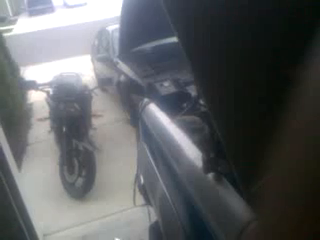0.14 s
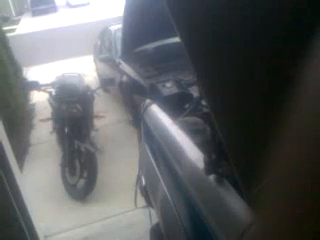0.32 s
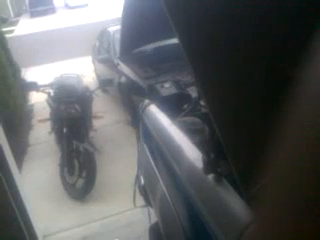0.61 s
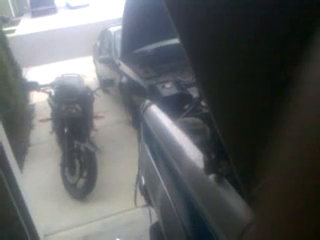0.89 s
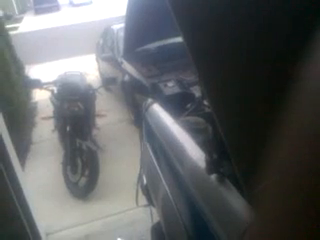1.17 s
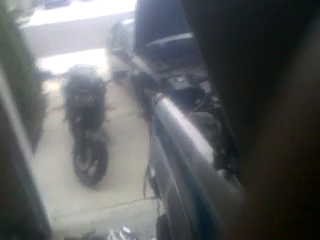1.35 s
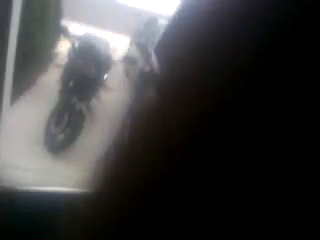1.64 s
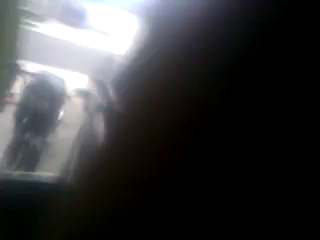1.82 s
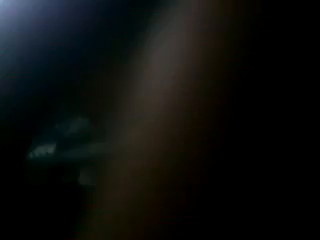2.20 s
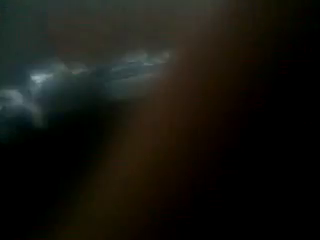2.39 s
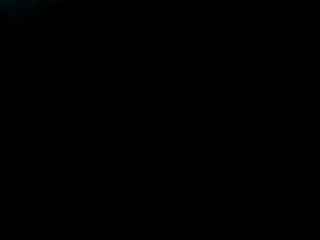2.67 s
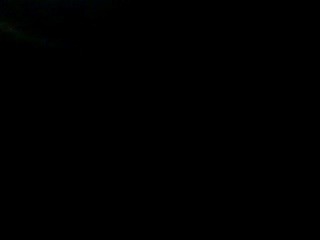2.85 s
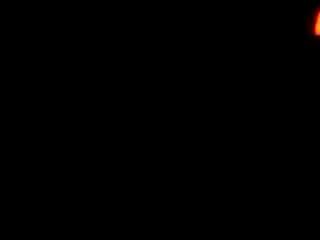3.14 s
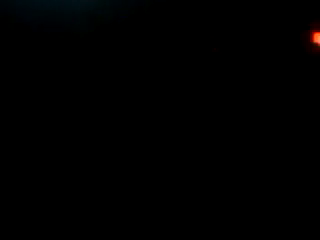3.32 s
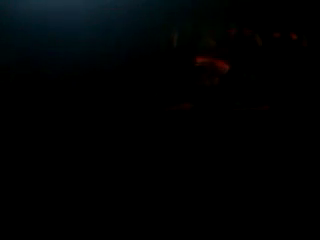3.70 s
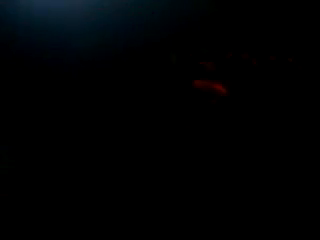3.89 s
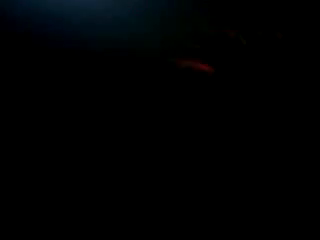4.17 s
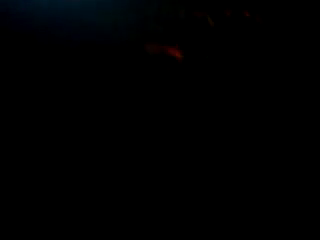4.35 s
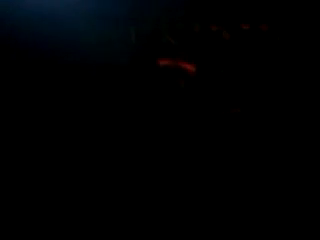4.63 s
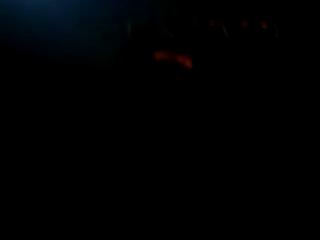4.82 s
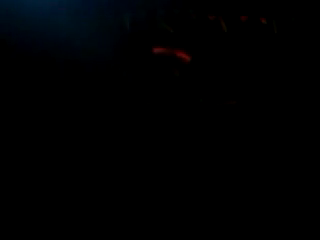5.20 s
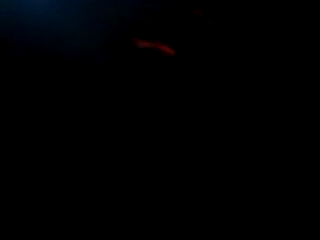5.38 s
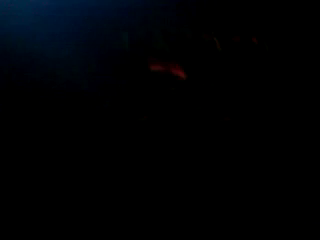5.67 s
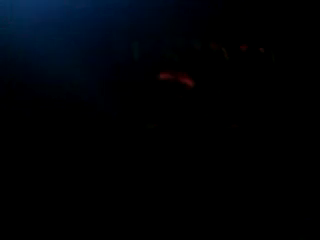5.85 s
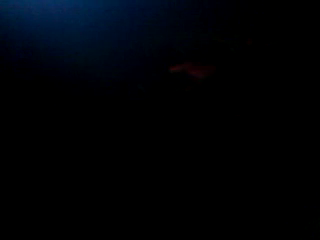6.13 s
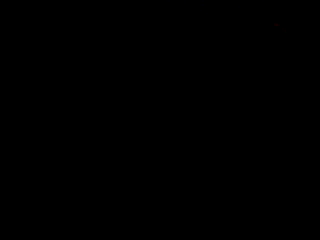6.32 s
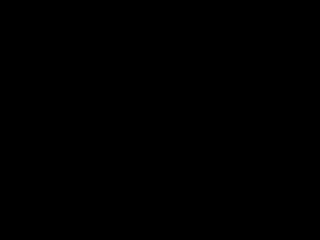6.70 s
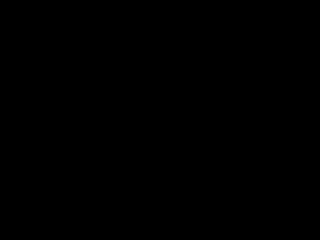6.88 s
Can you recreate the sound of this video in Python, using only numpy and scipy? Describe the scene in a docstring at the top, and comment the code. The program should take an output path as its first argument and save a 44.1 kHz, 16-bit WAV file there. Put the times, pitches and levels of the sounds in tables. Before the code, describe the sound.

Knocking V8 diesel idle with faint belt squeaks, then bumps and a thump, and three quick throttle blips heard inside the cab.

```python
"""A V8 diesel pickup idles with its hood open, heard first from the open door. Each firing knocks the
block and sends an exhaust pulse into the cab; injectors tick between firings, unequal cylinders make
the engine lope, and the belt squeaks faintly. From about 2 s, climbing in brings a few bumps, a heavy
thump and a hard click, and the engine is heard through the resonances of the cab. From about 5 s the
throttle is blipped three times: the knock hardens and the engine note sweeps through the cab modes."""
import sys
import numpy as np
from scipy import signal
from scipy.fft import rfft, irfft, next_fast_len
from scipy.io import wavfile
from scipy.ndimage import uniform_filter1d

SR = 44100
rng = np.random.default_rng(int(sys.argv[2]) if len(sys.argv) > 2 else 0)


def transcribe(u):
    """Save the signal u as a 16-bit wav file named by the first command-line argument.

    u: samples, shape (n,) or (channels, n), limited to [-1, 1]; the rate is SR.
    q: integer samples, one column per channel.
    """
    v = np.clip(np.atleast_2d(u).T, -1, 1)
    q = np.round(v * 32767).astype(np.int16)
    wavfile.write(sys.argv[1], SR, q)


N = 309573
T = np.arange(N) / SR

# relative strength of the cylinders in firing order, scaled by each layer (level/dB)
CYLINDER_LEVELS = [-3.0, -3.5, 3.5, 2.7, 1.0, -.6, -2.0, -2.6]
# firing rate at idle (t/s, f/Hz)
IDLE_RATE = [(0, 45.6), (.7, 45.8), (1.0, 47.2), (1.3, 46.0), (2.3, 46.3), (3.0, 46.0), (5.15, 46.0)]
# presses of the pedal (t/s, duration/s, relative fuel)
PEDAL_PRESSES = [(5.138, .07, 0.46), (5.199, 0.15, 1.1), (5.378, 0.045, 0.94), (5.783, 0.21, 0.73),
                 (6.146, 0.066, 0.28), (6.214, 0.044, 0.26), (6.252, 0.1, 1.0)]
# hard firings that flare into a rattle (t/s, accent/dB, decay/s, ring f/Hz)
HARD_FIRINGS = [(0.032, 1.5, 0.011, 1780), (0.138, 9.5, 0.055, 1910), (0.201, 1.5, 0.028, 2280),
                (0.372, 6, 0.009, 2160), (0.482, 7.5, 0.061, 870), (0.505, 3, 0.031, 1460),
                (0.739, -2.5, 0.019, 990), (0.853, 2, 0.037, 1850), (1.064, 3.5, 0.06, 2280),
                (1.24, 2.5, 0.023, 1830), (1.443, 2, 0.03, 1670), (1.550, 7, 0.03, 1310),
                (1.612, 0, 0.044, 2820), (1.864, 4, 0.026, 1210), (1.938, 1, 0.022, 1820),
                (2.137, 0, 0.046, 1300), (2.221, 8, 0.032, 2160), (2.39, 8, 0.036, 2530),
                (3.080, 4, 0.066, 1080), (3.147, 1, 0.045, 1840), (3.691, 2, 0.071, 1900),
                (3.859, -0.5, 0.061, 1820), (4.197, 1, 0.086, 2530), (4.550, 1, 0.069, 2790),
                (4.719, 2.5, 0.073, 2790), (4.885, 2.5, 0.029, 2660), (5.782, -0.5, 0.015, 2280),
                (5.842, 1.5, 0.035, 1750), (5.918, 4.5, 0.038, 2700), (5.97, 1.5, 0.04, 1680),
                (6.261, 0.5, 0.038, 2600), (6.292, 3, 0.026, 2700), (6.435, 4.5, 0.05, 1900),
                (6.535, 4, 0.094, 1800)]


def undb(db):
    """Amplitude ratio of a level in decibels."""
    return 10 ** (np.asarray(db) / 20)


def unit(x):
    """Normalisation to rms 1."""
    return x / np.sqrt(np.mean(x ** 2))


def steady(x):
    """Normalisation to a running rms of 1 over a third of a second."""
    return x / np.sqrt(uniform_filter1d(x ** 2, SR // 3) + 1e-12)


def between(table):
    """Linear interpolation of (t/s, value) points over the scene."""
    return np.interp(T, *np.transpose(table))


def dying(start, decay_s):
    """Exponential decay from 1 after a sudden onset."""
    return (T >= start) * np.exp(-np.abs(T - start) / decay_s)


def held(start, end, rise_s, fall_s):
    """First-order lag: a rise towards 1 from the start and a fall to 0 after the end."""
    return (1 - np.exp(-np.maximum(T - start, 0) / rise_s)) * np.exp(-np.maximum(T - end, 0) / fall_s)


def colour(x, points, modes=()):
    """Minimum-phase filter: a broad (f/Hz, level/dB) shape with resonant peaks and dips on top."""
    size = 2 * next_fast_len(N // 2 + SR // 4)
    f = np.maximum(np.fft.rfftfreq(size, 1 / SR), 1)
    hz, db = np.transpose(points)
    shape = np.interp(np.log(f), np.log(hz), db)
    for centre, width, peak in modes:
        shape = shape + peak / (1 + (2 * (f - centre) / width) ** 2)
    # folding the cepstrum makes the filter causal
    cepstrum = irfft(np.log(undb(shape)))
    cepstrum[1:size // 2] *= 2
    cepstrum[size // 2 + 1:] = 0
    return irfft(rfft(x, size) * np.exp(rfft(cepstrum)))[:N]


def revving(spin_up_s=.145, coast_s=.315):
    """Flywheel inertia: speed above idle, as a share of the full rev, rises fast and falls slowly."""
    # top of each blip (t/s, share of the full rev)
    blips = [(5.42, 1), (5.98, .57), (6.39, 1)]
    swells = [share * np.exp(-((T - s) / np.where(T < s, spin_up_s, coast_s)) ** 2)
              for s, share in blips]
    return np.max(swells, axis=0)


def fuelling():
    """Fuel follows the pedal with a first-order lag."""
    doses = [fuel * held(s, s + length, rise_s=.0049, fall_s=.062) for s, length, fuel in PEDAL_PRESSES]
    return np.max(doses, axis=0)


def firings(crank, lag, scatter_db, jitter_s, uneven_s):
    """Quasi-periodic impulses (sample, cylinder, size); each cylinder has its own timing offset."""
    number = np.arange(-1, int(crank[-1]))
    cylinder = number % 8
    offset = uneven_s * rng.standard_normal(8)
    jitter, scatter = rng.standard_normal((len(number), 2)).T
    when = np.interp(number + lag, crank, T, left=-1) + offset[cylinder] + jitter_s * jitter
    return np.clip(when * SR, 0, N - 1).astype(int), cylinder, undb(scatter_db * scatter)


def bursts(at, cylinder, size, decay_s, tail_db, tail_s, repeat):
    """Impulses excite decaying noise; the share `repeat` of its power recurs with each cylinder."""
    t = T[:SR // 8]
    envelope = np.hypot(np.exp(-t / decay_s), undb(tail_db) * np.exp(-t / tail_s))
    blows = np.zeros((8, N))
    blows[cylinder, at] = size
    recurring = sum(signal.oaconvolve(own, envelope * rng.standard_normal(len(t)))[:N] for own in blows)
    power = np.abs(signal.oaconvolve(blows.sum(0) ** 2, envelope ** 2)[:N])
    return np.sqrt(repeat) * recurring + np.sqrt((1 - repeat) * power) * rng.standard_normal(N)


def body_hum(crank, inside, rev):
    """Forced resonance: the idle firing rate sits on a low body mode, whose hum fades as speed rises."""
    # level of the hum at idle speed (t/s, level/dB)
    hum_levels = [(2.3, -36.5), (2.95, -29.5), (3.3, -27), (3.55, -31.5), (3.8, -27), (5.2, -28),
                  (7.0, -31)]
    push = np.cos(2 * np.pi * crank) + undb(13.5 - 3.6 * inside) * rng.standard_normal(N)
    spectrum = [(12, -6.5), (46, -12.0), (90, -13.5), (200, -47.0), (600, -100)]
    hum = steady(colour(push, spectrum, modes=[(46.3, 18, 3.3)]))
    detuned = np.interp(T - .092, T, np.tanh(rev / .65))  # delayed, as the mode rings on
    return undb(between(hum_levels) - 24 * detuned) * hum


def belt_squeaks(wobble_hz=40):
    """Friction: the belt slips on a pulley in short chirps of unsteady pitch."""
    # slips of the belt (t/s, f/Hz, rms level/dB, half duration/s)
    slips = [(.315, 4060, -31, .024), (.760, 4045, -32, .022), (.900, 4130, -36, .025),
             (1.085, 4050, -35, .03), (1.245, 4045, -31.5, .032), (1.420, 4040, -37, .03),
             (1.535, 4130, -35, .028), (1.975, 3950, -31, .018), (2.330, 4050, -38, .03)]
    wobble = np.cumsum(wobble_hz * unit(uniform_filter1d(rng.standard_normal(N), SR // 600))) / SR
    chirps = np.zeros(N)
    for s, hz, db, half_s in slips:
        envelope = np.sqrt(2) * undb(db) * np.exp(-((T - s) / half_s) ** 2)
        chirps += envelope * np.sin(2 * np.pi * (hz * T + wobble))
    return chirps


def panel_bumps():
    """Damped oscillation: soft blows give a short, low swing with a scuff of noise on top."""
    # climbing in, then the engine lurching on its mounts
    # (t/s, level/dB, f/Hz, decay/s, relative scuff level/dB)
    impacts = [(2.064, -9, 250, 0.0033, -10), (2.124, -5.5, 280, 0.0035, -15),
               (2.181, -3.5, 205, 0.0057, -10.5), (2.208, -16, 130, 0.0077, -3),
               (2.25, -10, 195, 0.0052, -4), (2.352, -14, 92, 0.0077, -6), (2.397, -12.5, 283, 0.0036, -2),
               (2.787, -13.5, 140, 0.0047, -1.5), (2.797, -13, 177, 0.0057, -29),
               (2.823, 6.5, 73.4, 0.0088, -28), (2.825, -3, 130, 0.0055, -12.5),
               (2.851, -11.5, 202, 0.0064, -5.5), (4.018, -16, 70, 0.0077, -14),
               (5.296, -19, 77.4, .025, -18), (5.291, -18, 166, 0.037, -20),
               (5.301, -12.5, 241, 0.021, -17), (6.315, -19, 236, 0.022, -19),
               (6.322, -18.5, 162, 0.025, -18), (6.324, -28, 82, 0.022, -22)]
    scuff_spectrum = [(60, -23), (190, 1.5), (340, 1), (520, -4.5), (730, -3.5), (1200, -17),
                      (6000, -14.0), (9000, -55.5)]
    thuds, scuffs = np.zeros(N), np.zeros(N)
    for s, db, hz, decay, scuff_db in impacts:
        t = np.maximum(T - s, 0)
        envelope = undb(db) * np.exp(-t / decay) * (1 - np.exp(-t * hz * 3))
        # a panel radiates little below its own pitch
        radiation = signal.butter(2, .5 * hz, "highpass", fs=SR, output="sos")
        thuds -= signal.sosfilt(radiation, envelope * np.sin(2 * np.pi * hz * t) + 1e-18)
        scuffs += envelope * undb(scuff_db)
    return thuds + scuffs * unit(colour(rng.standard_normal(N), scuff_spectrum))


def plastic_clicks():
    """Hard impacts excite a broad band: plastic snaps that die quickly in the cab."""
    # snaps before filtering (t/s, level/dB, decay/s)
    snaps = [(2.064, -12, 0.002), (2.179, -11.5, 0.0027), (2.787, -15.5, 0.0025), (2.821, -16.5, 0.013),
             (3.081, -22.5, 0.072), (3.332, -1.5, 0.0094)]
    # response of the plastic (f/Hz, level/dB)
    spectrum = [(250, -16), (700, -8), (1100, -27.5), (1650, 7.5), (2400, -13), (3700, -3), (5000, -13.5),
                (6400, -0.5), (7300, -3.5)]
    envelope = sum(undb(db) * dying(s, decay) for s, db, decay in snaps)
    return colour(envelope * rng.standard_normal(N), spectrum)


def engine_note(crank, flutter_db=1.8, flutter_hz=11):
    """Harmonic series of the firing rate: each partial swells as it glides across a cab mode."""
    # harmonics 1 to 5 before filtering (level/dB)
    harmonic_levels = [-8, -1.5, -6, -6, -9]
    # broad response to the note (f/Hz, level/dB)
    spectrum = [(50, -12), (75, 0), (100, -7), (135, -1), (200, -5), (270, -3), (330, -10), (450, -11)]
    # booms of the cab (f/Hz, width/Hz, level/dB)
    cab_modes = [(76, 10, 5), (162, 22, 3), (241, 20, 12)]
    slow = signal.butter(2, flutter_hz, fs=SR, output="sos")
    partials = np.zeros(N)
    for k, db in enumerate(harmonic_levels, 1):
        flutter = unit(signal.sosfilt(slow, rng.standard_normal(N)))
        partials += undb(db + flutter_db * flutter) * np.sin(2 * np.pi * k * crank)
    return colour(partials, spectrum, cab_modes)


def exhaust_drone(crank, inside):
    """Cavity resonance: exhaust puffs shake the body and drive the air modes of the cab."""
    # broad spectrum of the drone (f/Hz, level/dB)
    spectrum = [(20, -4.5), (40, 7.5), (80, 1.5), (125, 0.5), (190, 0.5), (290, -4.5), (400, -7),
                (600, -5.5), (1200, -62.5)]
    # peaks and dips beside the engine bay and in the cab (f/Hz, width/Hz, level/dB)
    bay_modes = [(81.4, 18, 4.5), (102, 18, -5.5), (128.6, 9.5, 10), (151, 48, -4.5), (310, 86, 4.5),
                 (534, 150, 3)]
    cab_modes = [(87, 14, 6.4), (128, 17, 5.9), (159, 24, 7), (245.4, 25.4, 13.8), (268, 16, 4)]
    pulses = firings(crank, lag=.5015, scatter_db=.5, jitter_s=.0002, uneven_s=.002394)
    puffs = unit(bursts(*pulses, decay_s=.033, tail_db=-1, tail_s=.026, repeat=.72))
    bay = steady(colour(puffs, spectrum, bay_modes))
    cab = steady(colour(puffs, spectrum, cab_modes))
    return steady((1 - inside) * bay + inside * cab)


def injector_ticks(crank, off_idle, fuel, rasp_fuel=.59):
    """Impact noise of injectors and valves: light at idle, a rasp under fuel, a hiss while coasting."""
    # broad spectrum of the ticks (f/Hz, level/dB)
    spectrum = [(1500, -31), (2400, -16), (2800, -2), (3300, -4), (4100, -1), (4800, -3.5), (5600, -2),
                (6600, -2.5), (7300, -7.5)]
    # metal resonances at idle, under load and coasting (f/Hz, width/Hz, level/dB)
    idle_modes = [(4050, 190, 6.5), (4460, 130, 4.6), (5400, 27, 1.3)]
    load_modes = [(2250, 140, 7), (2560, 290, 14), (2750, 350, 10.5), (3130, 160, 7.5), (3800, 340, -3.5),
                  (4420, 63, 5), (4870, 810, 8), (6800, 180, 2.5)]
    coast_modes = [(3050, 220, 8.5), (3780, 290, 1.2), (4850, 1800, 3.6)]
    at, cylinder, size = firings(crank, lag=.6, scatter_db=2.5, jitter_s=.002, uneven_s=.004)
    size = size * undb(.5 * np.array(CYLINDER_LEVELS))[cylinder]
    ticks = bursts(at, cylinder, size, decay_s=.0071, tail_db=6.5, tail_s=.08, repeat=.17)
    light, rasp, hiss = (steady(colour(ticks, spectrum, modes))
                         for modes in (idle_modes, load_modes, coast_modes))
    load = np.tanh(fuel / rasp_fuel)
    return steady((1 - off_idle) * light + off_idle * (load * rasp + (1 - load) * hiss))


def flare_rings(clatter, width_hz=130, gain_db=-2.5):
    """Selective resonance: each hard firing makes one part of the engine ring in a narrow band."""
    rings = np.zeros(N)
    for s, _, decay, hz in HARD_FIRINGS:
        span = (T >= s) & (T < s + .4)
        part = signal.butter(1, [hz - width_hz / 2, hz + width_hz / 2], "bandpass", fs=SR, output="sos")
        rings[span] += signal.sosfilt(part, clatter[span] * np.exp(-(T[span] - s) / decay))
    return undb(gain_db) * rings


def knock_accents(crank, off_idle, fuel):
    """Amplitude modulation in dB: unequal cylinders lope once in two turns; fuel adds hammering."""
    # depth of the lope (t/s, share of the cylinder differences)
    lope_depth = [(0.4, 0.76), (1.2, 0.74), (1.6, 0.68), (2.3, .5), (2.9, 0.58), (5.0, 0.82)]
    since_hardest_s = (crank - np.argmax(CYLINDER_LEVELS)) % 8 / between(IDLE_RATE)
    snap = 1.5 * np.exp(-since_hardest_s / .006)
    cycle = np.array(CYLINDER_LEVELS)[np.floor(crank).astype(int) % 8] + snap
    lope = cycle * (1 - off_idle) * between(lope_depth)
    hammer = 3 * fuel * (.5 - crank % 1)
    flare = sum(db * dying(s, decay) for s, db, decay, _ in HARD_FIRINGS)
    # the first firings of a press knock hardest
    bite = sum(4.5 * depth * dying(s, decay_s=.062) for s, _, depth in PEDAL_PRESSES)
    return uniform_filter1d(lope + hammer + flare + bite, SR // 300)


def combustion_knock(crank, inside, off_idle, fuel):
    """Impulse excitation: each combustion rings the block's modes and rebounds around the engine bay."""
    # broad spectrum of the knock (f/Hz, level/dB)
    spectrum = [(100, -30), (200, -19), (330, -9.5), (450, -12.5), (620, -9), (800, -3), (1000, -1.5),
                (1250, 0), (1550, -0.5), (1900, -3), (2300, -4.5), (2700, -10.5), (3200, -17.5),
                (4500, -18), (7000, -36.5)]
    # peaks and dips beside the bay, in the cab, and added there off idle (f/Hz, width/Hz, level/dB)
    bay_modes = [(577, 30, 3), (620, 36, 5.5), (775, 35, 6), (960, 28, 4.5), (1207, 41, 5), (1710, 56, 4.5),
                 (1872, 52, 5), (1958, 39, 6.5), (2268, 29, 8.5), (2470, 56, 5), (2655, 45, 4),
                 (2600, 54, 4), (3030, 59, 2.5)]
    cab_modes = [(480, 130, -5), (631, 21, 6), (721, 37, 5.5), (845, 30, 4), (930, 380, -2),
                 (1204, 56, 1.5), (1283, 24, 3.5), (1640, 35, -2.5), (1822, 100, 6), (2015, 100, 5),
                 (2214, 62, 5.5), (2765, 88, 5.5), (3110, 110, 6)]
    rev_modes = [(694, 160, 2), (1547, 51, 2), (1730, 50, 2), (1830, 210, -4.5), (2314, 44, 0)]
    at, cylinder, size = firings(crank, lag=.3, scatter_db=1, jitter_s=.002, uneven_s=.004)
    size = size ** (1 + 1.5 * off_idle[at])  # off idle the knocks differ more in strength
    blows = bursts(at, cylinder, size, decay_s=.004, tail_db=0, tail_s=.06, repeat=.22)
    bay, cab_idle, cab_revved = (steady(colour(blows, spectrum, modes))
                                 for modes in (bay_modes, cab_modes, cab_modes + rev_modes))
    cab = (1 - off_idle) * cab_idle + off_idle * cab_revved
    clatter = steady((1 - inside) * bay + inside * cab)
    clatter = clatter + flare_rings(clatter)
    # a harder knock is also brighter: accents act more strongly on the treble
    accent_db = knock_accents(crank, off_idle, fuel)
    dull = signal.sosfiltfilt(signal.butter(2, 1400, fs=SR, output="sos"), clatter)
    return dull * undb(.7 * accent_db) + (clatter - dull) * undb(1.3 * accent_db)


def scene():
    """Superposition: one crank phase drives all engine layers; speed and fuel set their levels."""
    # transmission of the engine past door and cab (t/s, level/dB)
    shielding = [(2.3, 2.4), (2.45, 0), (2.57, -7), (2.72, -1), (2.95, -6), (3.12, -5), (3.55, -5.5),
                 (5.3, -6), (6.3, -5), (7.0, -8.5)]
    rev, fuel = revving(), fuelling()
    off_idle = held(5.18, 6.857, rise_s=.076, fall_s=.076)  # the governor cuts the idle fuel
    inside = np.interp(T, [2.16, 2.6], [0, 1])  # from beside the engine bay into the cab
    firing_hz = between(IDLE_RATE) + 36.6 * rev
    crank = np.cumsum(firing_hz) / SR + .5  # phase, counted in firings
    harshness = np.tanh(fuel / .97) * (1 - .56 * rev)  # saturates with fuel, softens with speed
    knock_db = -25.5 + 9.5 * rev + 18 * harshness - 8 * off_idle
    tick_db = -32.5 + 8 * rev + 14 * fuel ** 2 - 3 * off_idle
    drone_db = -34 + 5.5 * rev + 7 * fuel - 1.5 * off_idle
    note_db = -36 + 4.5 * rev
    engine = (undb(knock_db) * combustion_knock(crank, inside, off_idle, fuel)
              + undb(tick_db) * injector_ticks(crank, off_idle, fuel)
              + undb(drone_db) * exhaust_drone(crank, inside)
              + undb(note_db) * off_idle * engine_note(crank))
    shielded = undb(between(shielding)) * engine
    hum = body_hum(crank, inside, rev)
    return (shielded + hum + belt_squeaks() + panel_bumps() + plastic_clicks())[None]


def record(dry, top_hz=7250):
    """Clipping and band limiting: the microphone overloads on the thump and passes no high treble."""
    clipped = np.clip(dry, -.71, .71)
    return signal.sosfilt(signal.ellip(10, .2, 80, top_hz, fs=SR, output="sos"), clipped)


dry = scene()
out = record(dry)
transcribe(out)
```